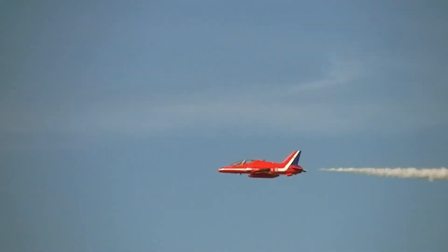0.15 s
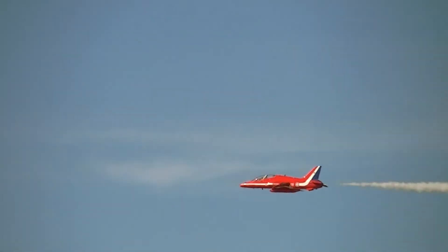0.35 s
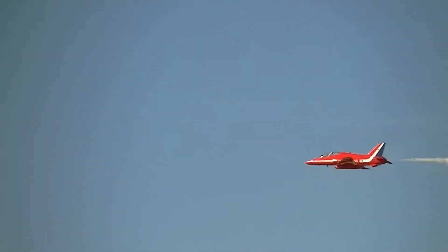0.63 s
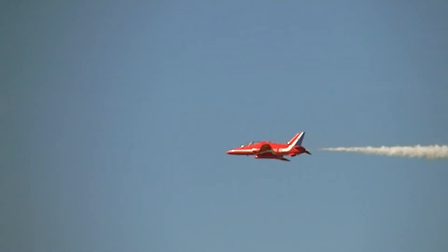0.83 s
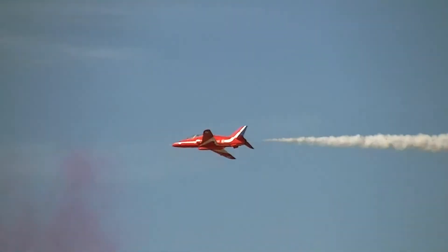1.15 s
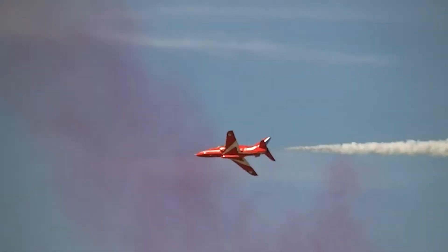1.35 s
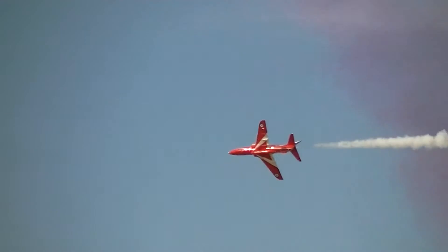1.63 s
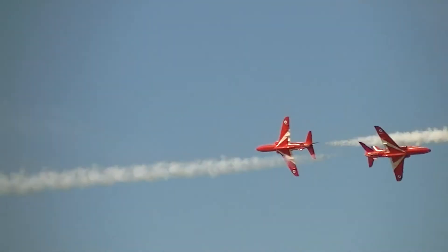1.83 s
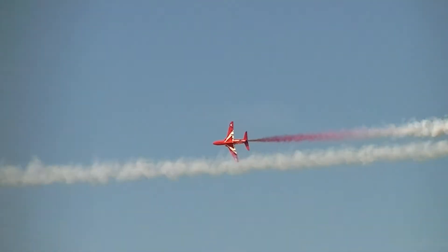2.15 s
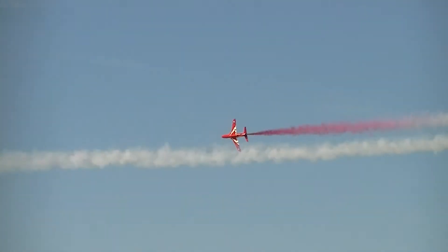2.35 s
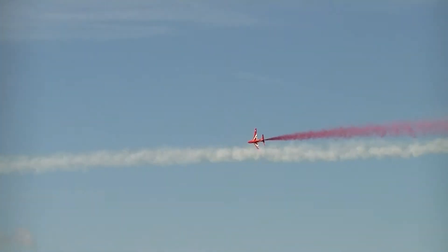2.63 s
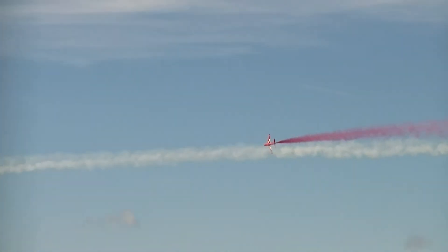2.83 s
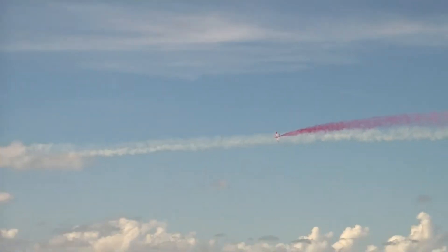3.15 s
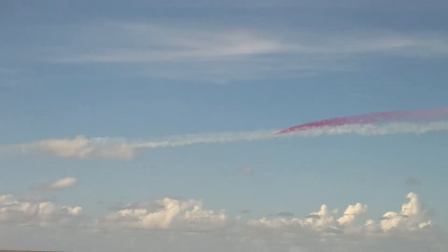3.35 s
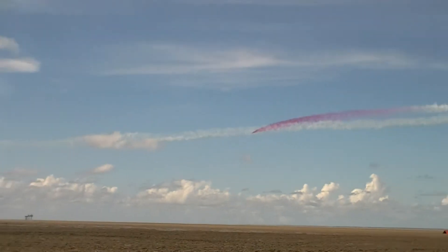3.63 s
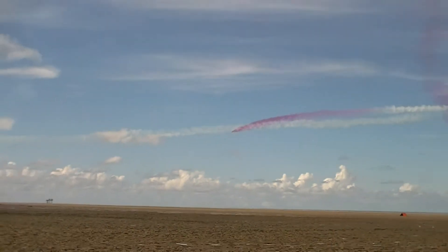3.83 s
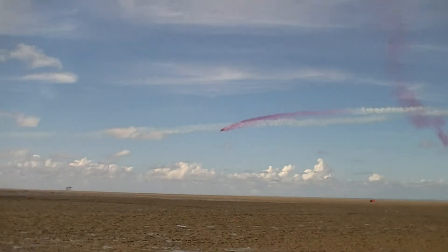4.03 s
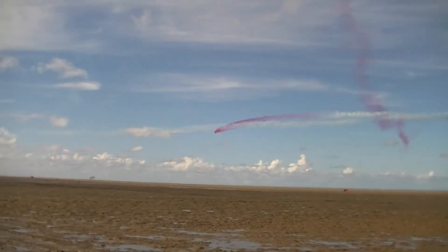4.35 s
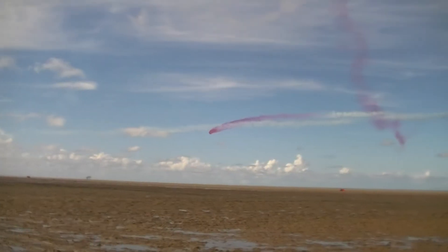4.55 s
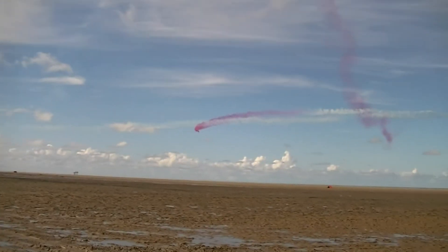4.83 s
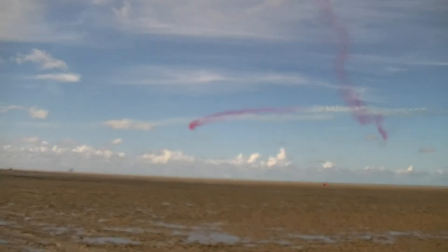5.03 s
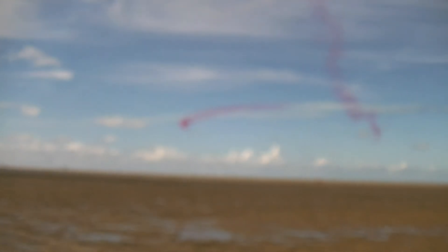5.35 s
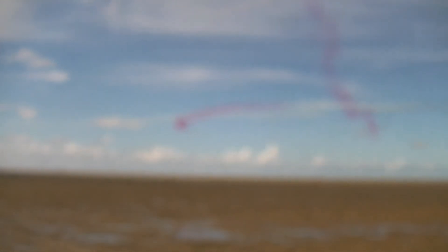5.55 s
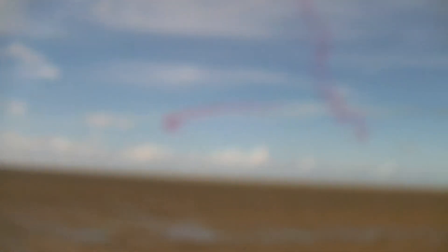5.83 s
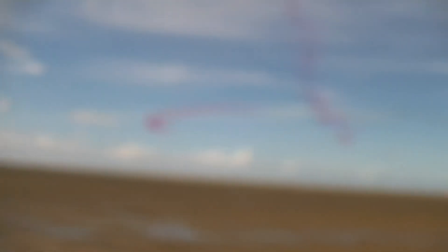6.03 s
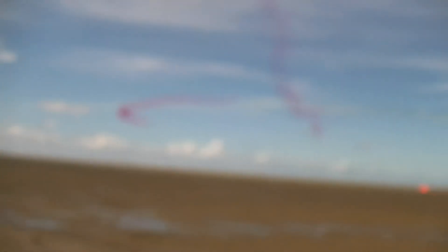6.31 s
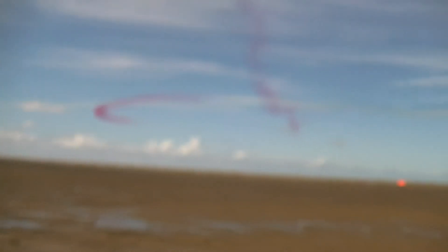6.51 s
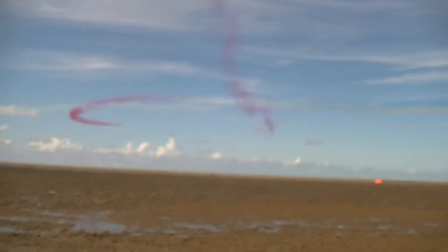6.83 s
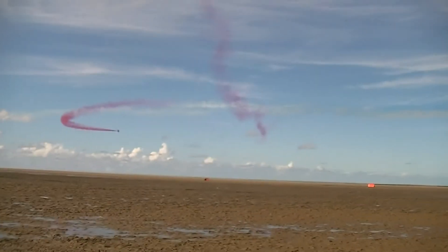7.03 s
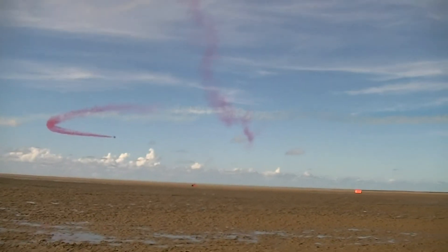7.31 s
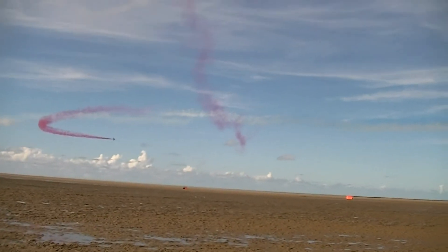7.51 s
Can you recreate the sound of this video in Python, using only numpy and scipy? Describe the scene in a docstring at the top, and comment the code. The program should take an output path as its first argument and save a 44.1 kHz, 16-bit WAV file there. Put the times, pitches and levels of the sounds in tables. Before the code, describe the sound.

A jet flies past outdoors with a falling turbine whine and a crackling roar that grows louder, while wind buffets the microphone.

```python
"""Jets over a tidal flat

Display jets cross an open tidal flat, and one banks away with its exhaust turned to the listener.
A turbine whine, falling by the Doppler effect, gives way to a crackling roar over a steady rumble.
Turbulent air makes the roar surge; interference with its ground reflection gives it a sliding, hollow
colour. Gusts buffet the two microphone ports. Close by are a thin hiss, a whirr, short rustles and
sharp ticks, after some of which the level dips briefly."""
import sys
import numpy as np
from scipy import signal
from scipy.fft import rfft, irfft, next_fast_len
from scipy.io import wavfile
from scipy.ndimage import uniform_filter1d, map_coordinates

SR = 44100
rng = np.random.default_rng(int(sys.argv[2]) if len(sys.argv) > 2 else 0)


def put_to_file(sound):
    """Save the sound as 16-bit audio at rate SR, in the file named by the first command-line argument."""
    columns = np.atleast_2d(sound).T  # one column per channel
    safe = np.clip(columns, -1, 1)
    whole_steps = np.round(safe * 32767)
    wavfile.write(sys.argv[1], SR, whole_steps.astype(np.int16))


N = 338643
TIME = np.arange(N) / SR
FFT_SIZE = next_fast_len(N, real=True)
FREQ = np.maximum(np.arange(FFT_SIZE // 2 + 1) * SR / FFT_SIZE, 1)

# Exhaust noise, rising as the jet turns its tail to the listener.
# Each row: time in seconds, relative levels of the low roar and of the higher rasp in dB.
EXHAUST_LEVELS = [(0, -29.5, -32), (.78, -38.5, -42.5), (1.13, -29.5, -33.5), (1.55, -34, -35.5),
                  (2.05, -33, -38.5), (2.4, -28, -30), (2.68, -33, -34.5), (3.22, -31, -36.5),
                  (3.78, -36, -33.5), (4.05, -26, -28), (4.75, -28.5, -33.5), (5.3, -27.5, -28),
                  (5.7, -25, -30), (6.8, -24, -31), (7.33, -26, -32), (7.68, -27.5, -30.5)]
# Directivity: roar and rasp of the jet approaching, abeam and flying away.
# Each row: frequency in Hz, relative spectral density in dB.
ROAR_AHEAD = [(260, -42), (450, -6.5), (579, 0.5), (800, -2.5), (1150, 0.5), (1500, -31.5), (2530, -120)]
ROAR_ABEAM = [(260, -40.5), (450, -8.5), (620, 2), (850, 6), (1150, 5.5), (1500, -32), (2530, -120)]
ROAR_AWAY = [(260, -50), (450, -8.5), (550, -1.5), (700, -3), (950, -0.5), (1150, -7.5), (1500, -34.5),
             (2530, -120)]
RASP_AHEAD = [(680, -34), (1150, -0.5), (1340, -0.5), (1540, 0), (2000, -1.5), (2620, -9.5), (3220, -11.5),
              (3780, -18.5), (4550, -25), (5920, -46.5), (10000, -120)]
RASP_ABEAM = [(680, -26.5), (1150, -6.5), (1540, -2.5), (2190, -5.5), (3350, -18), (4060, -24), (4550, -34),
              (5920, -47.5), (10000, -120)]
RASP_AWAY = [(680, -25.5), (1150, -3), (1350, -2.5), (1620, -5), (2060, -9), (2680, -17), (3170, -19),
             (3780, -30.5), (4550, -34.5), (5920, -57.5), (10000, -120)]
ROAR_ASPECTS_S, RASP_ASPECTS_S = (3.33, 4.1, 5.42), (2.8, 3.3, 7.44)   # ahead, abeam, away
# Focusing by the air. Each row: centre and half length in seconds, roar gain and rasp gain in dB.
SURGES = [(0.01, 0.013, 3.5, 5), (0.114, 0.017, 7, 8), (0.286, 0.018, 6, 4.5), (0.405, 0.028, 5.5, 7),
          (0.474, 0.0071, 8.5, 8), (0.566, 0.015, 11, 15), (0.686, 0.0072, 6, 4.5), (.845, .014, 3, 4.5),
          (0.93, 0.026, 3.5, 9), (1.002, 0.022, 1, 9), (1.032, 0.0079, -5, -5), (1.107, .009, 2.5, 6.5),
          (1.152, 0.012, 0.5, 3.5), (1.215, 0.024, -5.5, 2), (1.406, 0.034, -1, 6.5),
          (1.525, 0.0066, 11, 1), (1.714, 0.049, 1, 6), (1.913, 0.019, 5.5, 4), (2.189, 0.015, 2, 6),
          (2.225, 0.032, 3.5, 7.5), (2.641, 0.011, -9, 2), (2.797, 0.021, 3.5, 4), (2.888, 0.0059, -11, -6),
          (2.914, 0.0067, -3, -5.5), (3.34, 0.029, -0.5, 3.5), (3.416, 0.024, -2.5, -0.5),
          (3.525, 0.076, 0, 6.5), (3.647, 0.029, 6, 7), (3.745, 0.017, 2, 5), (3.897, 0.05, 7, 8),
          (3.935, 0.0063, -1, 4), (4.018, 0.024, -0.5, 4), (4.265, 0.036, -1, 7), (4.393, 0.052, -1.5, 8.5),
          (4.52, 0.054, 2, 2), (4.638, 0.043, 3, 6), (4.706, 0.018, 1, 5.5), (4.867, 0.037, 4.5, 7),
          (4.963, 0.018, -2, -3.5), (5.12, 0.068, 2, 2.5), (5.592, 0.011, 4, 7), (5.63, 0.033, -5, -4),
          (5.987, 0.05, 3, 5.5), (6.012, 0.021, -2, 2.5), (6.194, 0.022, 1, -1.5), (6.329, 0.031, 2, 5.5),
          (6.45, 0.042, -1, -4), (6.919, 0.037, 1.5, 6.5), (6.983, 0.014, 6, 5), (7.035, 0.013, 2, -6),
          (7.076, 0.023, 2, 5), (7.326, 0.044, -5.5, -4), (7.568, 0.025, 5.5, -2.5)]
# Transmission of the exhaust's treble. Each row: time in seconds, gain in dB.
TREBLE_GAIN = [(.1, -2.5), (.55, 4), (.78, 3.5), (.97, -2), (1.55, -4), (2.4, -2.5), (3.3, -4), (3.9, -3),
               (4.3, -1.5), (5.45, 3), (6.85, -3.5), (7.1, -5.5), (7.68, -1.5)]
# Ground reflection. Each row: time in seconds, lag behind the direct sound in seconds.
GROUND_LAG = [(.1, .0014), (.55, .00122), (1.1, .00135), (2.2, .0014), (3.05, .00133), (3.35, .00113),
              (3.9, .0011), (4.4, .0013), (5.0, .00138), (5.5, .00145), (5.95, .00156), (6.9, .00151),
              (7.68, .00145)]
# Turbine blade tone. Each row: time in seconds, Doppler-shifted frequency in Hz, relative level in dB.
WHINE = [(0, 3500, -67), (.75, 3394, -57), (1.4, 3392, -58), (2.2, 3372, -55), (2.46, 3210, -50.5),
         (2.8, 3050, -51), (3.15, 2950, -54), (3.9, 2737, -47.5), (4.6, 2478, -59.5)]
# Flares of the whine. Each row: centre and half length in seconds, gain in dB.
WHINE_FLARES = [(.938, .022, 3), (1.14, .022, 6), (2.425, .018, 6), (2.495, .02, 6), (2.59, .022, 5.5),
                (2.677, 0.027, 4.5), (2.79, 0.015, 3.5), (2.866, .014, 8), (3.156, 0.017, 10)]
# Gusts (positive), and moments when the wind noise is turned down as the jet surges (negative).
# Each row: centre and half length in seconds, gain in dB.
GUSTS_AND_DUCKS = [(.1, 0.021, -15), (0.206, 0.0094, 12), (0.375, 0.016, -22), (0.422, 0.012, 14),
                   (0.646, 0.023, 4), (1.175, 0.011, 7), (1.412, 0.021, 10), (1.587, 0.013, -18),
                   (1.736, 0.07, -11), (1.813, 0.014, 10), (2.027, 0.015, 0.5), (2.208, 0.037, -12),
                   (2.43, 0.058, 5), (2.609, 0.0056, 9), (2.955, 0.14, 4.5), (3.294, 0.0095, 7),
                   (3.934, 0.046, -14), (4.094, 0.032, 3), (4.447, 0.039, -13), (4.782, 0.07, 9),
                   (6.4, 0.022, 12)]
# Envelopes of the plume's rumble, the wind on the ports, the hiss and the whirr.
# Each row: time in seconds, relative level in dB.
RUMBLE_LEVEL = [(0, -43.5), (1, -44.5), (2, -42), (2.6, -46), (3.2, -52), (4.3, -40.5), (4.85, -38.5),
                (5.2, -39.5), (5.8, -38), (6.8, -39.5), (7.68, -40.5)]
WIND_LEVEL = [(0, -40.5), (.6, -35), (1.35, -34), (1.75, -34.5), (2.4, -33.5), (3.15, -32.5), (3.8, -32.5),
              (4.6, -41.5), (5.3, -42), (6.1, -46), (7.0, -44.5), (7.68, -36.5)]
HISS_LEVEL = [(0, -75), (.6, -77), (1.3, -73.5), (1.9, -73), (2.35, -74.5), (3.0, -73.5), (4.3, -79),
              (5.2, -79), (6.6, -79), (7.2, -84), (7.68, -79)]
WHIRR_LEVEL = [(.08, -110), (.13, -76), (.28, -70), (.41, -72), (.44, -110)]
# Spectra of the rumble, small and large eddies on a port, the hiss, the whirr and a rustle.
# Each row: frequency in Hz, relative spectral density in dB.
RUMBLE_COLOUR = [(25, -65.5), (65, -60), (100, -39.5), (160, -19), (240, -8), (340, -3.5), (450, 4)]
BUFFET_COLOUR = [(40, -54.5), (65, -52), (100, -33), (150, -18.5), (230, -9), (350, -1), (500, 3),
                 (700, -3.5), (1000, -8.5), (1600, -15.5), (2500, -24), (4000, -39), (6000, -55),
                 (10000, -67.5)]
THUD_COLOUR = [(200, -17), (320, -1.5), (520, -1.5), (800, -5.5)]
HISS_COLOUR = [(5000, 2.5), (6600, 1.5), (8500, -5), (10500, -10.5), (13000, -17.5), (15500, -27)]
WHIRR_COLOUR = [(6200, -11.5), (6700, 3.5), (7200, -5), (7800, -0.5), (8600, -2), (9200, -11)]
RUSTLE_COLOUR = [(4500, 8.5), (6600, -4), (8300, -9.5), (10500, -17.5), (13000, -24), (15500, -42)]
# Which port faces the wind. Each row: time in seconds, left over right in dB.
WINDWARD = [(0, -1), (.8, 5), (1.3, -3), (1.8, 3.5), (2.5, -3), (2.95, -4.5), (4.5, -3), (5.5, -5.5),
            (7.68, 0.5)]
# Ticks. Each row: start in seconds, relative level in dB, following dip in dB (negative for a lift).
TICKS = [(.025, -23, 3), (0.199, -18.5, 11), (.418, -22, 16), (0.491, -28, 4), (0.862, -25, -3.5),
         (0.8663, -12, 11), (1.02, -32, 1), (1.168, -29, 4), (1.411, -34, 12.5), (1.678, -25, -3),
         (1.983, -27, 3), (3.086, -27, -1.5), (3.685, -34, -0.5), (4.257, -25, -1), (6.274, -26, 1)]
# Rustles. Each row: centre and half length in seconds, relative level in dB.
RUSTLES = [(.29, 0.027, -67), (0.688, 0.0044, -54), (0.75, 0.023, -66), (1.747, 0.053, -60),
           (1.887, 0.037, -61), (2.06, 0.054, -65), (2.183, .025, -62), (3.212, 0.014, -60),
           (3.277, 0.031, -64), (3.896, 0.044, -58), (6.275, 0.028, -59.5)]
# Howls of the roar and whistles of the turbine. Each row: centre and half length in seconds,
# frequency in Hz, glide in octaves per second, relative level in dB.
HOWLS = [(1.137, .03, 2124, 2.5, -36), (1.228, 0.025, 1330, 0, -27.5), (1.396, 0.02, 1805, -2.5, -30.5),
         (1.467, 0.067, 1352, -6.5, -29.5), (2.991, 0.052, 400, 1.5, -31), (3.34, 0.031, 2804, 2, -33.5),
         (3.578, 0.09, 1730, -0.7, -27.5), (3.92, 0.023, 1850, 2.5, -22), (4.124, 0.032, 620, 1, -24),
         (4.282, 0.038, 1480, -1, -23.5), (4.423, 0.024, 1470, -1, -15.5), (4.89, 0.054, 930, 0, -20),
         (4.917, 0.038, 330, -1, -32), (5.423, 0.088, 676, 0, -22.5), (5.821, 0.04, 627, -1, -25.5),
         (6.182, 0.12, 629.4, -0.8, -25), (6.811, 0.066, 568, 0.5, -21), (6.912, 0.055, 1333, 0.5, -25),
         (6.914, 0.041, 2220, -2.5, -26.5), (7.09, 0.028, 1242, 0.5, -24),
         (7.573, 0.035, 1398, -0.5, -25.5)]
WHISTLES = [(2.63, .08, 4385, -.38, -62), (2.755, .045, 4510, -.75, -65.5), (3.32, .022, 4000, -.4, -57)]
# Single strong shocks. Each row: start in seconds, peak of the direct sound in dB.
CRACKS = [(2.835, -15), (2.899, -15), (3.28, -19), (6.889, -15)]
# Balance of the microphones. Each row: frequency in Hz, left over right in dB.
MIC_BALANCE = [(100, -1.1), (4000, -.6)]
# Incoherence of the microphones. Each row: frequency in Hz, side over mid in dB.
MIC_SPREAD = [(100, -23.5), (500, -24.5), (1500, -28), (3500, -22), (6000, -24.5), (10000, -13.5)]


def from_db(db):
    """Amplitude ratio of a level in decibels."""
    return np.exp(np.asarray(db) * (np.log(10) / 20))


def rms_one(x):
    """Normalisation to rms 1."""
    return x / np.sqrt(np.mean(x ** 2) + 1e-20)


def in_time(rows):
    """Linear interpolation of each column to every sample."""
    s, *columns = np.transpose(rows)
    return [np.interp(TIME, s, column) for column in columns]


def over_hz(points):
    """Interpolation of a table along a logarithmic frequency axis."""
    hz, value = np.transpose(points)
    return np.interp(np.log(FREQ), np.log(hz), value)


def butterworth(order, hz, kind="low"):
    """Sections of a maximally flat filter."""
    return signal.butter(order, hz, kind, fs=SR, output="sos")


def delayed(x, lag_s):
    """Both channels after a varying propagation delay."""
    return np.array([np.interp(TIME - lag_s, TIME, side, left=0) for side in x])


def drift(rate_hz):
    """Low-pass random fluctuation of rms 1 with its corner at rate_hz."""
    hz = np.arange(N // 32 // 2 + 1) * SR / N
    spectrum = rfft(rng.standard_normal(N // 32)) / (1 + (hz / rate_hz) ** 2)
    slow = rms_one(irfft(spectrum))
    return np.interp(np.linspace(0, len(slow) - 1, N), np.arange(len(slow)), slow)


def bell(s, half_s, steepness=3.5):
    """Flat-topped envelope of height 1, down to 0.61 at half_s either side of s."""
    near = slice(*np.searchsorted(TIME, [s - 4 * half_s, s + 4 * half_s]))
    out = np.zeros(N)
    out[near] = np.exp(-.5 * np.abs((TIME[near] - s) / half_s) ** steepness)
    return out


def noise_pair(impulses=0):
    """Spectra of white noise plus impulses, largely coherent at two closely spaced microphones."""
    mid, side = rng.standard_normal((2, N))
    mid = rfft(rms_one(mid + impulses), FFT_SIZE)
    side = from_db(over_hz(MIC_SPREAD)) * rfft(side, FFT_SIZE)
    signs = np.array([[1], [-1]])
    return (mid + signs * side) * from_db(signs * over_hz(MIC_BALANCE) / 2)


def coloured(spectrum, colour):
    """Spectral shaping to a sound of rms 1 that falls steeply beyond the ends of the colour table."""
    skirts = 1 / np.sqrt((1 + (colour[0][0] / FREQ) ** 12) * (1 + (FREQ / colour[-1][0]) ** 12))
    return rms_one(irfft(spectrum * from_db(over_hz(colour)) * skirts, FFT_SIZE)[:, :N])


def rush(envelope, colour, flutter_db, rate_hz, grains=0):
    """Shaped noise and grains, amplitude-modulated by an envelope and a random flutter."""
    db, = in_time(envelope)
    return from_db(db + flutter_db * drift(rate_hz)) * coloured(noise_pair(grains), colour)


def narrow_band(hz, width_hz):
    """Random modulation of amplitude and phase broadens a gliding tone into a band of rms 1."""
    phase = 2 * np.pi * np.cumsum(hz) / SR
    steps = np.arange(len(hz)) * width_hz / SR
    knots = rng.standard_normal((2, N // 32))
    in_phase, quadrature = (np.interp(steps, np.arange(len(row)), row) for row in knots)
    return rms_one(in_phase * np.cos(phase) + quadrature * np.sin(phase))


def bloom(s, half_s, hz, glide, db, width_hz):
    """A narrow band glides exponentially under a bell envelope."""
    out = bell(s, half_s)
    near = out > 0
    out[near] *= from_db(db) * narrow_band(hz * 2 ** (glide * (TIME[near] - s)), width_hz)
    return out


def crackle(per_s, spread_db, clump_db):
    """A Poisson process of uneven one-sided impulses; its drifting rate gathers them in clumps."""
    born = rng.random(N) < per_s * from_db(clump_db * drift(14)) / SR
    return rms_one(born * from_db(spread_db * np.minimum(rng.exponential(1, N), 4)))


def directivity(spectrum, colours, aspects_s):
    """A jet's spectrum depends on angle, so the colour changes as its tail turns to the listener."""
    shares = [np.interp(TIME, aspects_s, one) for one in np.eye(len(colours))]
    return sum(np.sqrt(share) * coloured(spectrum, colour) for share, colour in zip(shares, colours))


def surges():
    """Refraction in turbulent air focuses the sound or bends it away: roar and rasp gains in dB."""
    return sum(np.outer(gains_db, bell(s, half_s)) for s, half_s, *gains_db in SURGES)


def exhaust(surge_db, roar_shocks_db, rasp_shocks_db):
    """Turbulent mixing radiates noise and shocks; eddies on the path modulate them, the treble more."""
    roar_db, rasp_db = in_time(EXHAUST_LEVELS) + surge_db
    shocks = crackle(per_s=460, spread_db=5.0, clump_db=4.5)
    path_db = 0.84 * drift(24)
    roar_source = noise_pair(from_db(roar_shocks_db) * shocks)
    rasp_source = noise_pair(from_db(rasp_shocks_db) * shocks)
    roar = directivity(roar_source, (ROAR_AHEAD, ROAR_ABEAM, ROAR_AWAY), ROAR_ASPECTS_S)
    rasp = directivity(rasp_source, (RASP_AHEAD, RASP_ABEAM, RASP_AWAY), RASP_ASPECTS_S)
    roar *= from_db(roar_db + 0.5 * path_db + 0.24 * drift(8.3))
    rasp *= from_db(rasp_db + path_db + 0.7 * drift(16))
    return roar + rasp


def air_transmission(x, treble_hz):
    """The air transmits now more of the treble, now less."""
    treble_db, = in_time(TREBLE_GAIN)
    dull = signal.sosfilt(butterworth(2, treble_hz), x)
    return dull + from_db(treble_db) * (x - dull)


def scintillation(x, depth_db, patch_hz, patch_s):
    """Eddies focus each band separately, so patches of the spectrum swell and fade."""
    hz, s, spectra = signal.stft(x, SR, nperseg=512)
    field = rng.standard_normal((int(hz[-1] / patch_hz) + 2, int(s[-1] / patch_s) + 2))
    grid = np.meshgrid(hz / patch_hz, s / patch_s, indexing="ij")
    gain = from_db(depth_db * map_coordinates(field, grid, order=2))
    return signal.istft(spectra * rms_one(gain), SR, nperseg=512)[1][:, :N]


def ground_reflection(x, echo_db, top_hz):
    """The rippled wet flat scatters treble but mirrors the low roar: a comb that slides with the jet."""
    lag_s, = in_time(GROUND_LAG)
    low = signal.sosfiltfilt(butterworth(3, top_hz), x)
    return x + from_db(echo_db) * delayed(low, lag_s)


def second_ray(x, delay_s, wander_s, echo_db):
    """Multipath interference: a second ray through turbulent air comes and goes, sweeping a comb."""
    lag_s = delay_s + wander_s * drift(1.6)
    strength = from_db(echo_db) * np.tanh(drift(6.5))
    return (x + strength * delayed(x, lag_s)) / np.sqrt(1 + strength ** 2)


def turbine(surge_db, surge_share, gain_db, flutter_db, width_hz):
    """The Doppler-shifted blade tone, broadened by the air, flutters, flares and follows the surges."""
    hz, db = in_time(WHINE)
    flare_db = sum(peak_db * bell(s, half_s) for s, half_s, peak_db in WHINE_FLARES)
    db = db + gain_db + flare_db + surge_share * surge_db + flutter_db * drift(30)
    return from_db(db) * narrow_band(hz, width_hz)


def plume_rumble():
    """Large, slow eddies of the plume radiate low-frequency noise."""
    return rush(RUMBLE_LEVEL, RUMBLE_COLOUR, flutter_db=1.5, rate_hz=26)


def wind(gain_db, lumps_db, shared_db, lumps_hz, lump_limit_db, thuds_per_s, thud_db):
    """Turbulent pressure on each port: small eddies break in uneven lumps, large ones land as thuds."""
    db, = in_time(WIND_LEVEL)
    db = db + drift(26) + sum(change_db * bell(s, half_s) for s, half_s, change_db in GUSTS_AND_DUCKS)
    windward_db, = in_time(WINDWARD)
    power_share = 1 / (1 + from_db(np.array([-windward_db, windward_db])) ** 2)
    eddy_db = np.array([lumps_db * drift(lumps_hz) for port in range(2)]) + shared_db * drift(lumps_hz)
    eddy_db = lump_limit_db * np.tanh(eddy_db / lump_limit_db)
    eddies = coloured(rfft(rng.standard_normal((2, N)) * from_db(eddy_db), FFT_SIZE), BUFFET_COLOUR)
    impacts = (rng.random((2, N)) < thuds_per_s / SR) * rng.uniform(-1.0, 1, (2, N))
    thuds = from_db(thud_db) * coloured(rfft(impacts, FFT_SIZE), THUD_COLOUR)
    return from_db(db + gain_db) * np.sqrt(2 * power_share) * (eddies + thuds)


def hiss():
    """Sparse impulses in high-frequency noise are heard as a thin, scratchy hiss."""
    scratches = from_db(-4.5) * crackle(per_s=60, spread_db=1.0, clump_db=2)
    return rush(HISS_LEVEL, HISS_COLOUR, flutter_db=1.9, rate_hz=70, grains=scratches)


def ticks(body_hz, damping_s, scratch_db, scratch_s):
    """A heavily damped oscillation swings back once, with a short scratch behind it at each port."""
    out = np.zeros((2, N))
    age = TIME[:SR // 50]
    edge = np.exp(-age / damping_s) * np.cos(2 * np.pi * body_hz * age)
    for s, db, _ in TICKS:
        scratch = from_db(scratch_db) * rng.standard_normal((2, len(age))) * np.exp(-age / scratch_s)
        out[:, round(s * SR):][:, :len(age)] += from_db(db) * (edge + scratch)
    return signal.sosfilt(butterworth(2, [350, 8500], "band"), out)


def dips(recovery_s):
    """A gain that drops at most ticks, lifts at a few, and recovers linearly in decibels."""
    drop_db = sum(db * (TIME > s) * np.clip(1 - (TIME - s) / recovery_s, 0, 1) for s, _, db in TICKS)
    return from_db(-uniform_filter1d(uniform_filter1d(drop_db, size=200), size=140))


def whirr():
    """A high band of noise with fluttering amplitude is heard as a brief, thin whirr."""
    return rush(WHIRR_LEVEL, WHIRR_COLOUR, flutter_db=2.0, rate_hz=40)


def rustles(grains_db, flutter_db):
    """Dense impulses and noise merge into short patches of fine scratching."""
    envelope = sum(from_db(db) * bell(s, half_s) for s, half_s, db in RUSTLES)
    grains = from_db(grains_db) * crackle(per_s=500, spread_db=0.5, clump_db=6.5)
    return envelope * from_db(flutter_db * drift(60)) * coloured(noise_pair(grains), RUSTLE_COLOUR)


def howls(gain_db, relative_width, low_cut_hz):
    """Narrow-band noise has pitch: bands of the roar swell into brief, gliding howls."""
    out = sum(bloom(s, half_s, hz, glide, db + gain_db, relative_width * hz)
              for s, half_s, hz, glide, db in HOWLS)
    return signal.sosfilt(butterworth(4, low_cut_hz, "high"), out)


def whistles(width_hz):
    """Higher turbine tones sweep past, falling in pitch, while the jet is abeam."""
    return sum(bloom(*row, width_hz) for row in WHISTLES)


def cracks(band_hz):
    """Single strong shocks, rounded by propagation over distance, stand out of the crackle."""
    out = np.zeros(N)
    band = butterworth(2, band_hz, "band")
    shock = signal.sosfilt(band, signal.sosfilt(band, signal.unit_impulse(SR // 100)))
    for s, db in CRACKS:
        out[round(s * SR):][:len(shock)] += from_db(db) * shock / np.abs(shock).max()
    return out


def scene():
    """Superposition of the distant jet, heard through air and off the ground, and the near sounds."""
    surge_db = surges()
    jet = exhaust(surge_db, roar_shocks_db=-9.5, rasp_shocks_db=-5.5)
    jet = air_transmission(jet, treble_hz=2770)
    jet = scintillation(jet, depth_db=1.5, patch_hz=260, patch_s=.05)
    jet += cracks(band_hz=[350, 2480])
    jet = ground_reflection(jet, echo_db=-9, top_hz=2100)
    jet = from_db(-0.82) * second_ray(jet, delay_s=0.002543, wander_s=0.000579, echo_db=-6.0)
    jet += howls(gain_db=-3.5, relative_width=.25, low_cut_hz=300)
    jet += turbine(surge_db[1], surge_share=0.99, gain_db=2.5, flutter_db=3.2, width_hz=300)
    jet += whistles(width_hz=25)
    rumble = plume_rumble()
    near = hiss() + rustles(grains_db=-4.0, flutter_db=4.5) + whirr()
    gusts = wind(gain_db=-2.5, lumps_db=5.5, shared_db=5.0, lumps_hz=56, lump_limit_db=16.5,
                 thuds_per_s=22, thud_db=-4.0)
    near += ticks(body_hz=900, damping_s=0.00026, scratch_db=-21.0, scratch_s=0.0012)
    return (jet + rumble + gusts) * dips(recovery_s=0.04) + near


def record(dry):
    """Band limiting: a wind filter removes the deep bass and a steep low-pass cuts the top."""
    thin = signal.sosfilt(butterworth(2, 55, "high"), dry)
    return signal.sosfilt(signal.ellip(10, .1, 80, 15700, fs=SR, output="sos"), thin)


dry = scene()
out = record(dry)
put_to_file(out)
```